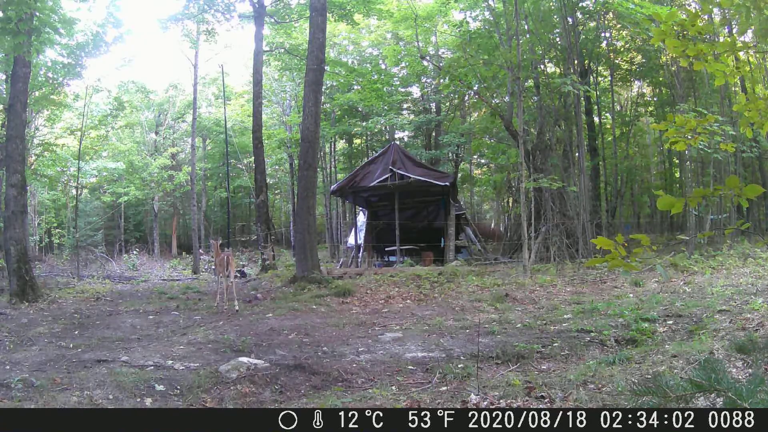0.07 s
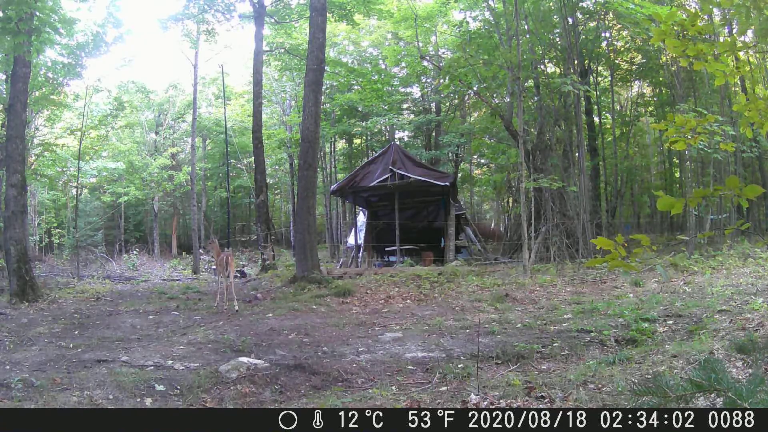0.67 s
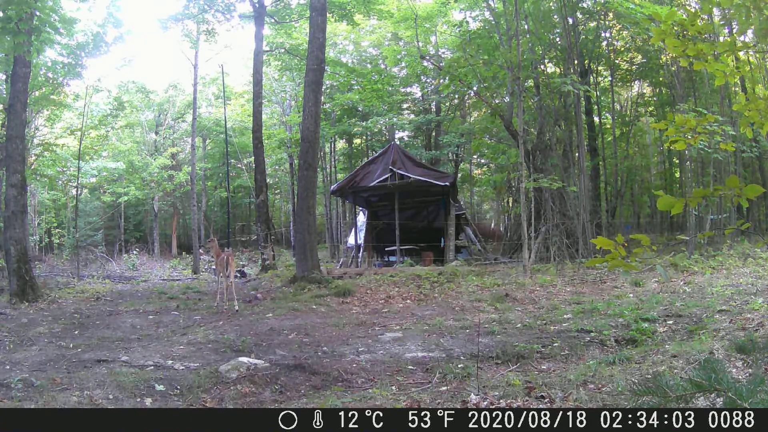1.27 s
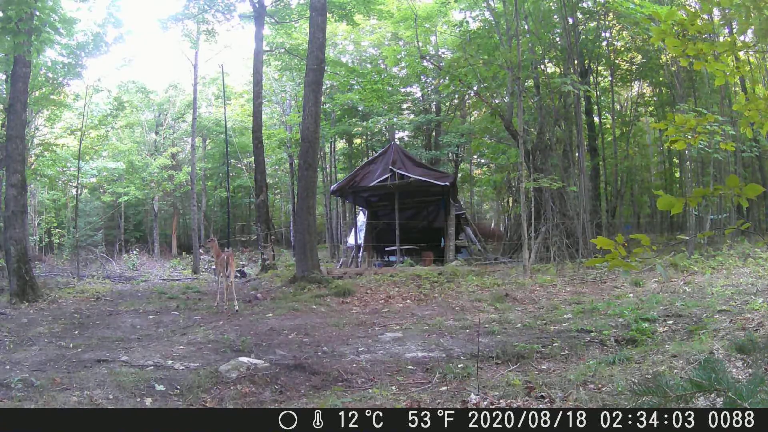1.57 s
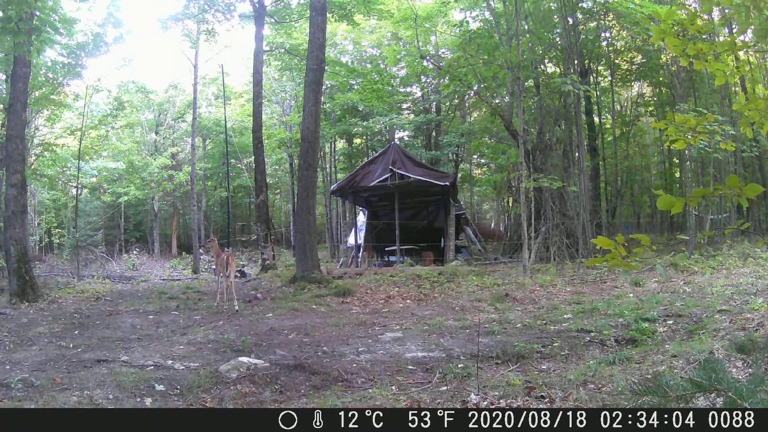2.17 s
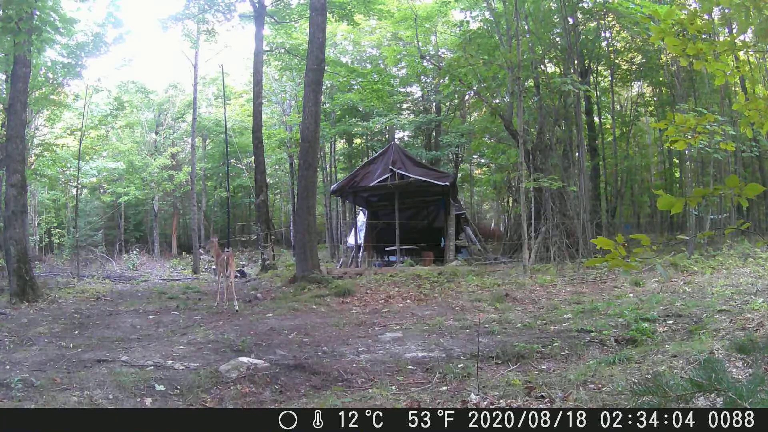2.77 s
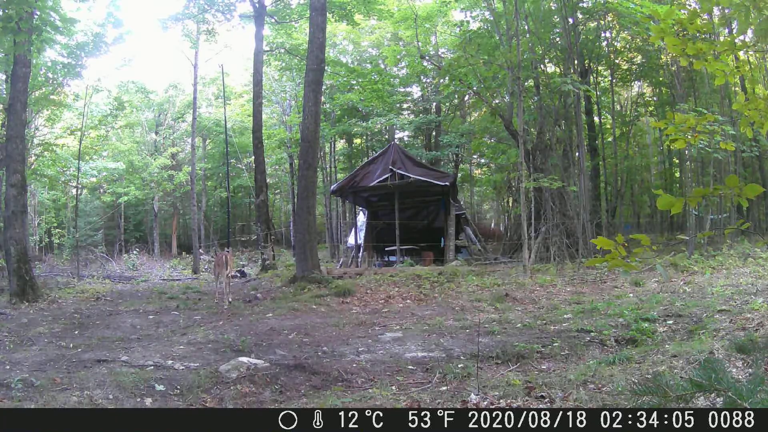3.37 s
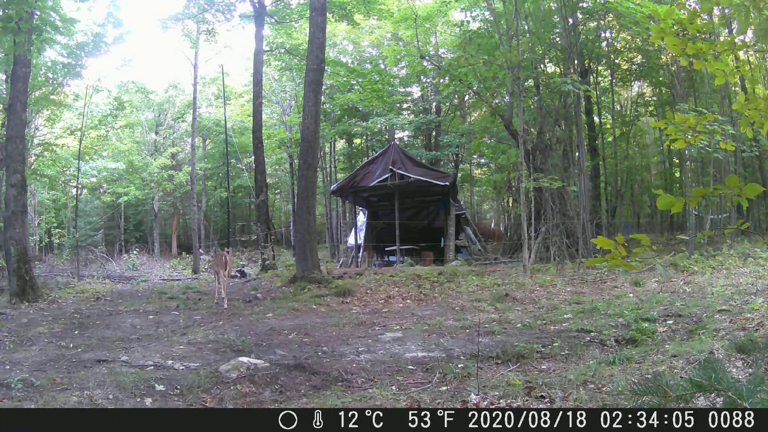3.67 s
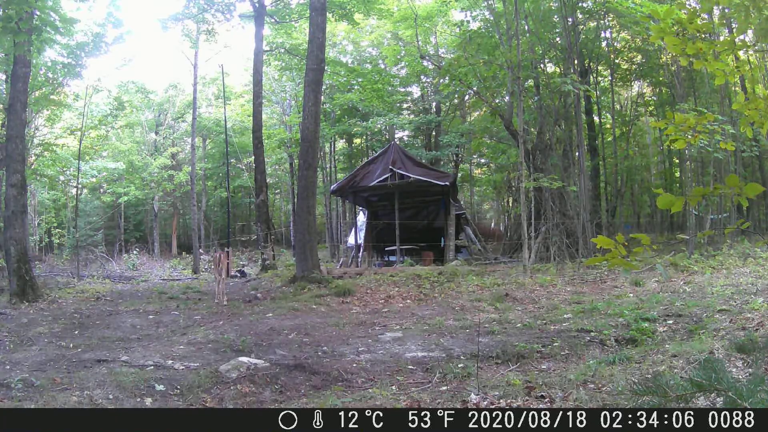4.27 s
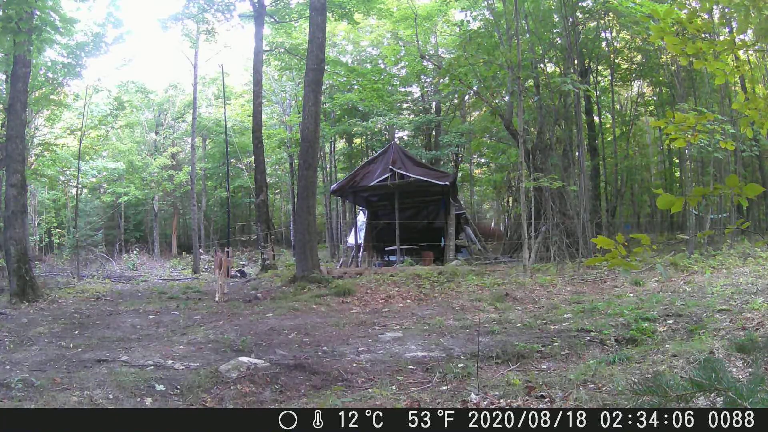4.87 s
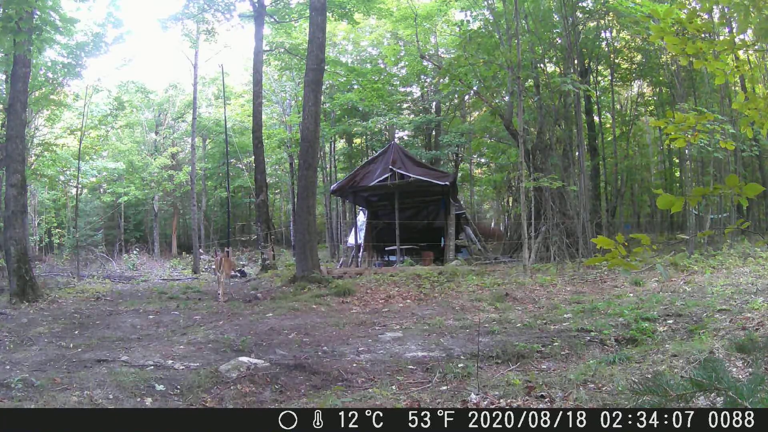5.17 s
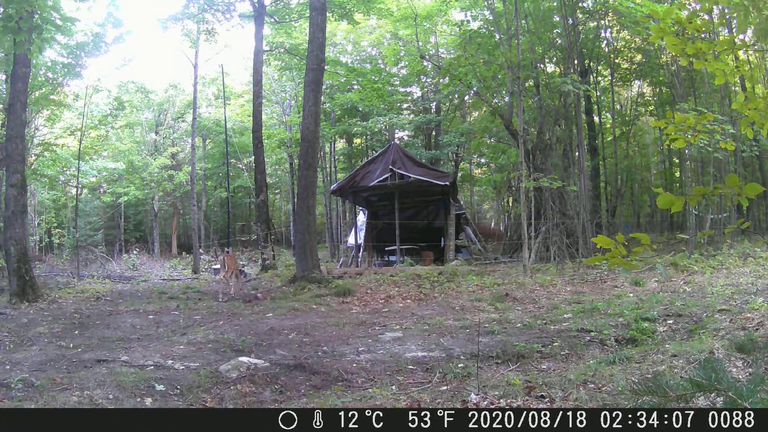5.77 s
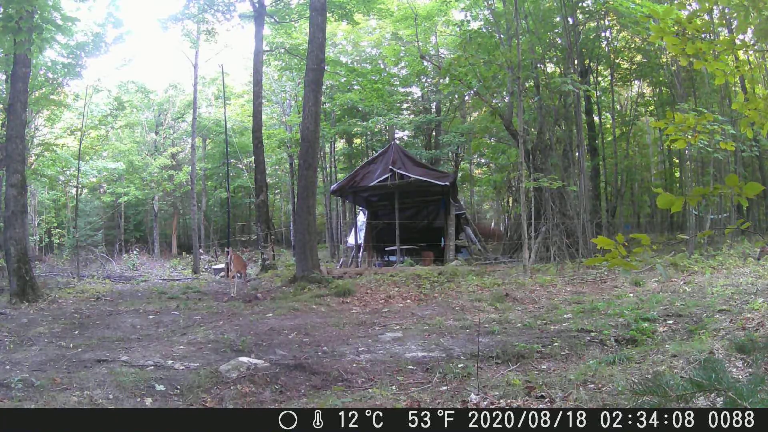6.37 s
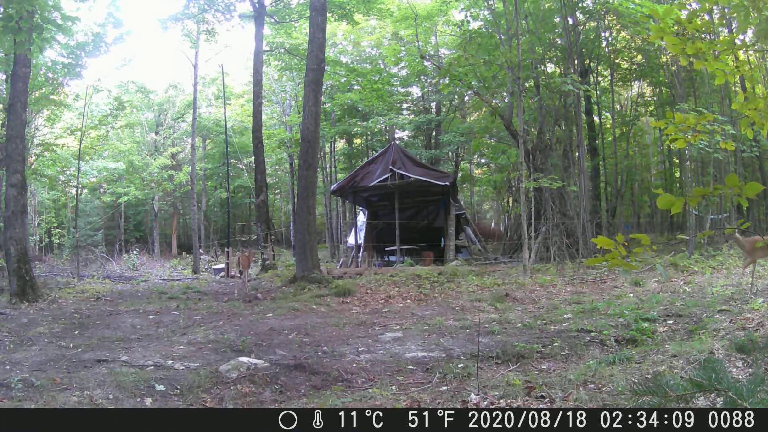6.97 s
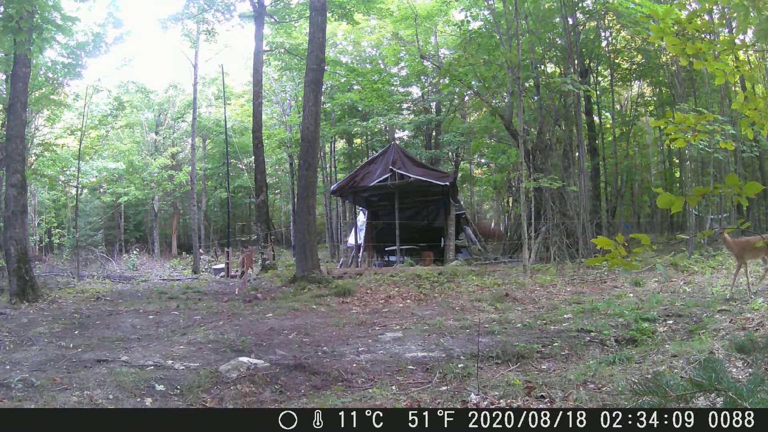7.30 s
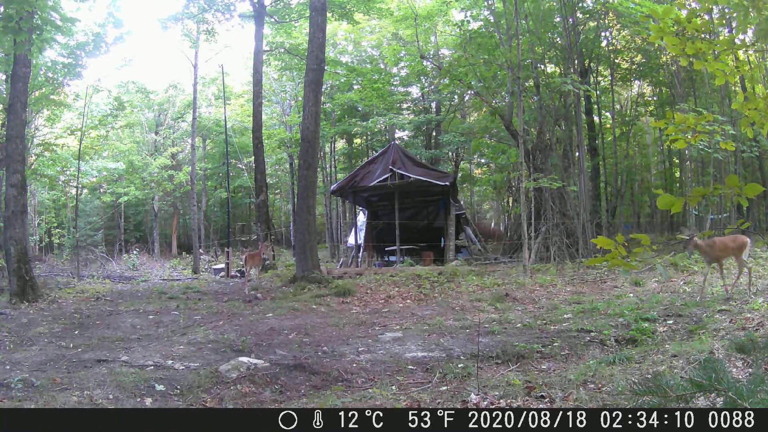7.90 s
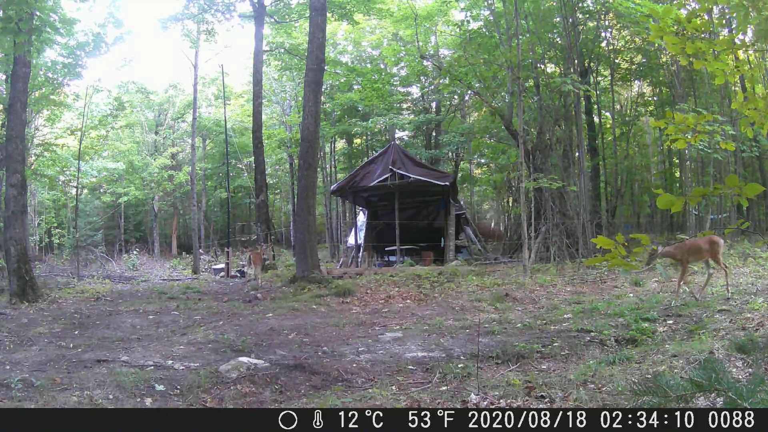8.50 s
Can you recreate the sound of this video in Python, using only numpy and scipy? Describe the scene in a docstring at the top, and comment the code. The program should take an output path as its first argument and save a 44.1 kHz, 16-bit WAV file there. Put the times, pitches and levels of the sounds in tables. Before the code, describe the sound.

In a still forest clearing, a dull, even hiss of leaves and microphone noise runs throughout. Far beyond the trees, a low rumble like traffic carries a wavering motor drone, swelling and easing several times from the middle onward. Light air flutters deeply against the small fixed microphone and gives one soft puff near the end. A faint low hum lies underneath and recedes about halfway.

```python
"""Forest clearing with a far rumble

A still clearing, heard through the small microphone of a fixed, boxed camera. Far off, like traffic
beyond the trees, a rumble with a motor note in it swells and eases; a narrow drone near 175 Hz comes
and goes with it. Close by, air flutters deeply at the microphone and puffs once. A faint low hum lies
underneath, and over it all the steady, dull hiss of leaves and microphone."""
import sys
import numpy as np
from scipy import signal
from scipy.fft import rfft, irfft, next_fast_len
from scipy.io import wavfile
from scipy.ndimage import uniform_filter1d, map_coordinates

SR = 44100
rng = np.random.default_rng(int(sys.argv[2]) if len(sys.argv) > 2 else 0)


def wav_record(signal):
    """Record a signal, one row per channel, as 16-bit PCM in the file named by sys.argv[1]."""
    frames = np.transpose(np.atleast_2d(signal))
    bounded = np.clip(frames, -1, 1)
    # unit amplitude maps onto the largest positive 16-bit level
    quanta = np.round(bounded * 32767).astype(np.int16)
    wavfile.write(sys.argv[1], SR, quanta)


N = 376613

# Resonances of the far rumble: pitch_hz, width_hz, level_db
RUMBLE_RESONANCES = [(95.3, 33, -5.5), (110.9, 12, -1.5), (125.4, 4, -.5), (155, 20, -9.5),
                     (215.4, 20, -14.5), (255.4, 33, -17.5), (332, 79, -27), (400, 45, -30.5)]
# Surges over the resting rumble: crest_s, rise_s, level_db, brightness_db
RUMBLE_SURGES = [(1.78, 0.091, -61, 4), (3.44, .13, -50, 0), (4.62, .45, -50.5, 1.1),
                 (6.18, .17, -51.5, -3), (6.85, .28, -54.5, -10.5)]
# The drone's two close resonances: pitch_hz, width_hz, level_db
DRONE_RESONANCES = [(171.6, 12, -5), (187.2, 7, -6)]
# Moments when the drone stands out: crest_s, gain_db
FLARES = [(1.08, 6.5), (2.97, 5.5), (3.7, 5.5), (5.36, 3.5)]
# Spectrum of air moving at the microphone: frequency_hz, level_db
AIR_SPECTRUM = [(2, -10.5), (6, -1.5), (15, 0), (35, -3.5), (52, -2), (68, -8.5), (100, -14.5),
                (150, -18.5), (300, -29), (600, -48.5), (1500, -110)]
# One soft puff of air: crest_s, half_length_s, gain_db
AIR_PUFF = (6.95, .16, 4.4)
# Spectrum of the hiss of leaves and microphone: frequency_hz, level_db
HISS_SPECTRUM = [(100.0, -0.5), (450.0, 0.0), (750.0, -3.5), (1050.0, -4.5), (1700.0, -10), (2550.0, -15.5),
                 (3600.0, -25), (4500.0, -35), (5200.0, -38.5), (6400.0, -31), (7200.0, -28.5),
                 (7900.0, -32), (8450.0, -40.5), (8700, -60)]

RUMBLE_REST_DB = -57


def far_rumble(lower_surge_db, upper_surge_db, motor_hz=110.9, motor_db=-8, split_hz=190):
    """Beyond the trees, a dull roar and a wavering motor note swell; bright surges lift the top more."""
    roar = steadied(noise(lambda hz: resonances(RUMBLE_RESONANCES, hz)), span_s=.28, share=.85)
    motor = amp(motor_db) * tone(motor_hz, drift_hz=1.9, rate_hz=9)
    rumble = unit(roar + motor)
    lower = signal.sosfiltfilt(signal.butter(2, split_hz, fs=SR, output="sos"), rumble)
    upper = rumble - lower
    return amp(RUMBLE_REST_DB + lower_surge_db) * lower + amp(RUMBLE_REST_DB + upper_surge_db) * upper


def surges(ebb_over_rise=1.7):
    """Lift in dB of the rumble's lower and upper bands: each surge builds, then ebbs with a long tail."""
    t = np.arange(N) / SR
    power = np.ones((2, N))
    for crest_s, rise_s, level_db, brightness_db in RUMBLE_SURGES:
        ebb = 1 / (1 + ((t - crest_s) / (ebb_over_rise * rise_s)) ** 2)
        envelope = np.where(t < crest_s, bump(crest_s, rise_s), ebb)
        band_gains = amp(level_db - RUMBLE_REST_DB) * np.array([1, amp(brightness_db)])
        power += np.outer(band_gains ** 2, envelope)
    return 10 * np.log10(power)


def far_drone(surge_db, motor_hz=173.5, rest_db=-62, surge_share=.96, waver_db=1.25):
    """A higher, distant motor note beats against two narrow resonances, follows the surges and flares."""
    ringing = noise(lambda hz: resonances(DRONE_RESONANCES, hz))
    motor = tone(motor_hz, drift_hz=2.3, rate_hz=12)
    drone = steadied(ringing + motor, span_s=.25, share=.85)
    flare_db = sum(gain_db * bump(crest_s, half_length_s=.13) for crest_s, gain_db in FLARES)
    return amp(rest_db + surge_share * surge_db + flare_db + waver_db * wobble(6)) * drone


def air_at_microphone(level_db=-52, drift_db=.34):
    """Light air flutters right at the microphone opening and puffs once."""
    flutter = steadied(noise(lambda hz: colour(AIR_SPECTRUM, hz)), span_s=.4, share=.4)
    crest_s, half_length_s, puff_db = AIR_PUFF
    return amp(level_db + drift_db * wobble(1.2) + puff_db * bump(crest_s, half_length_s)) * flutter


def low_hum(pitch_hz=41.3, level_db=-60, waver_db=2.5, fade_start_s=3.7, fade_s=.66, drop_db=9.5):
    """A faint deep tone wavers in pitch and level, holds, then sinks further into the background."""
    fade = np.clip((np.arange(N) / SR - fade_start_s) / fade_s, 0, 1)
    gain = amp(level_db - drop_db * fade + waver_db * wobble(4.5))
    return gain * tone(pitch_hz, drift_hz=.8, rate_hz=3)


def hiss(level_db=-65.5):
    """Leaves and the microphone itself make an even hiss, with a thin sheen near 7 kHz."""
    return amp(level_db) * noise(lambda hz: colour(HISS_SPECTRUM, hz))


def amp(db):
    """Decibels to gain."""
    return 10 ** (np.asarray(db) / 20)


def unit(x):
    """x at rms 1."""
    return x / np.sqrt(np.mean(x ** 2) + 1e-30)


def bump(crest_s, half_length_s):
    """A smooth rise to 1 at the crest and back."""
    return np.exp(-((np.arange(N) / SR - crest_s) / half_length_s) ** 2)


def wobble(rate_hz):
    """A smooth random curve through rate_hz knots a second."""
    knots = rng.standard_normal(int(N * rate_hz / SR) + 4)
    return map_coordinates(knots, [np.arange(N) * rate_hz / SR])


def tone(pitch_hz, drift_hz, rate_hz):
    """A sine of rms 1 whose pitch wanders."""
    wandering_hz = pitch_hz + drift_hz * wobble(rate_hz)
    return unit(np.sin(2 * np.pi * np.cumsum(wandering_hz) / SR))


def colour(spectrum, hz):
    """Gain of a spectrum whose points are joined on a log frequency axis."""
    frequency_hz, level_db = np.transpose(spectrum)
    return amp(np.interp(np.log(hz + 1), np.log(frequency_hz + 1), level_db))


def resonances(modes, hz):
    """Gain of separately stirred resonances with steep skirts: their powers add."""
    power = 0
    for pitch_hz, width_hz, level_db in modes:
        detuning = (hz ** 2 - pitch_hz ** 2) / ((hz + 1e-6) * width_hz)
        power += (amp(level_db) / (1 + detuning ** 2)) ** 2
    return np.sqrt(power)


def noise(gain):
    """Noise of rms 1 coloured by a gain function of frequency."""
    size = next_fast_len(N + SR // 2)
    spectrum = rfft(rng.standard_normal(size)) * gain(np.fft.rfftfreq(size, 1 / SR))
    return unit(irfft(spectrum, size)[:N])


def steadied(x, span_s, share):
    """x at rms 1, with a share of its chance swells longer than span_s evened out."""
    width = int(span_s * SR)
    power = np.abs(uniform_filter1d(uniform_filter1d(x ** 2, width), width)) + 1e-9
    return unit(x / power ** (share / 2))


def scene():
    """Far and near meet at one microphone; the same surges drive rumble and drone."""
    lower_surge_db, upper_surge_db = surges()
    distant = far_rumble(lower_surge_db, upper_surge_db) + far_drone(lower_surge_db)
    return (distant + low_hum() + air_at_microphone() + hiss())[None]


def record(dry):
    """The sound opens with a brief fade-in; the camera cuts it steeply above its band limit."""
    fade_in_s, band_limit_hz = .004, 8600
    fade_in = np.minimum(np.arange(N) / (fade_in_s * SR), 1)
    low_pass = signal.ellip(10, .05, 90, band_limit_hz, fs=SR, output="sos")
    return signal.sosfilt(low_pass, dry * fade_in)


dry = scene()
out = record(dry)
wav_record(out)
```